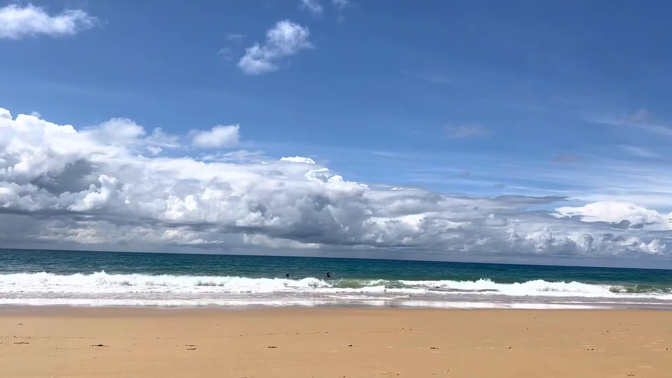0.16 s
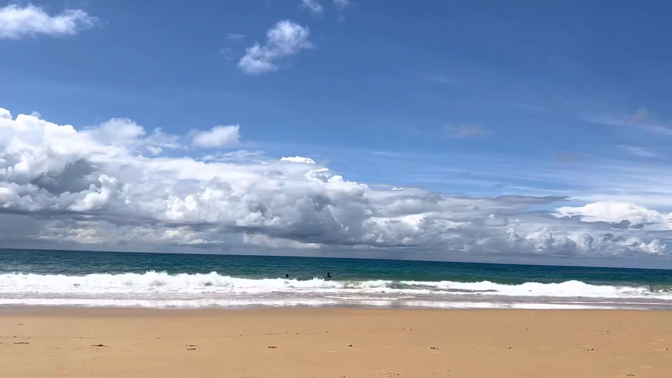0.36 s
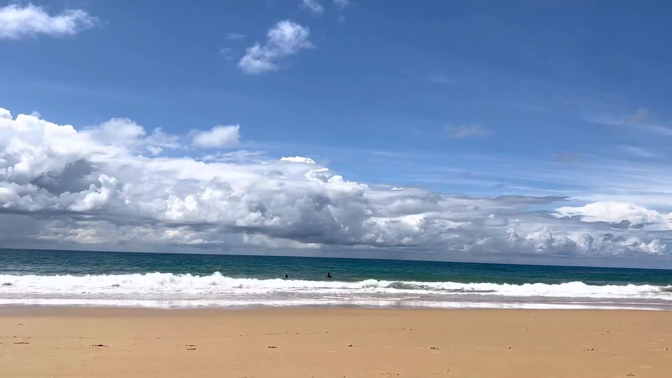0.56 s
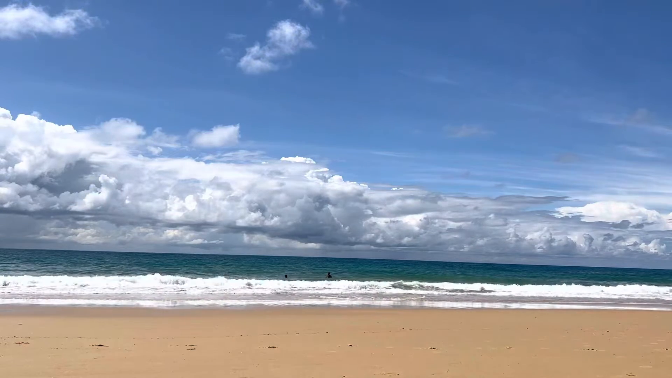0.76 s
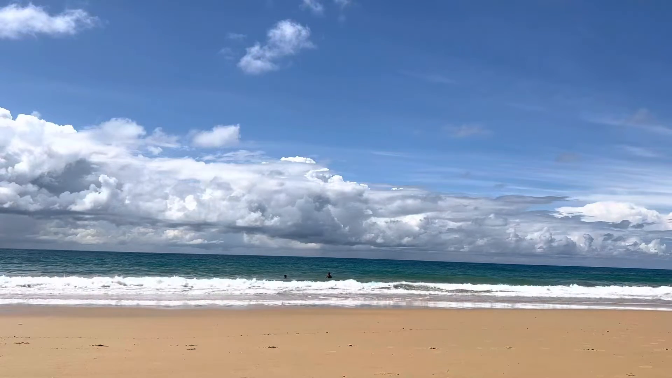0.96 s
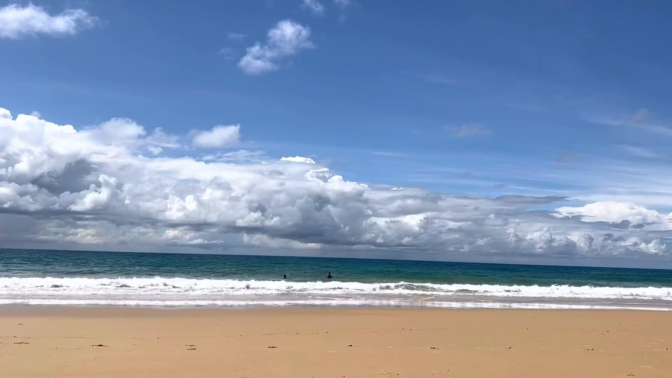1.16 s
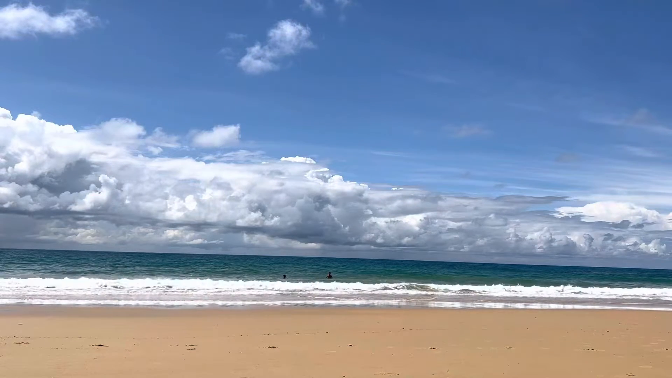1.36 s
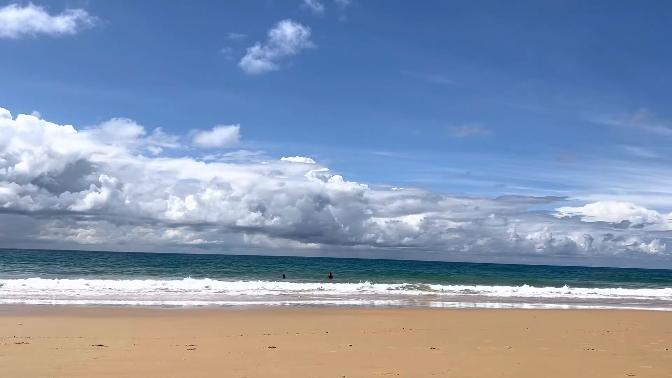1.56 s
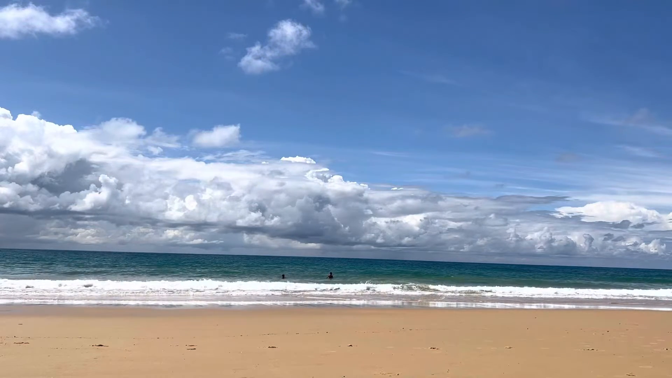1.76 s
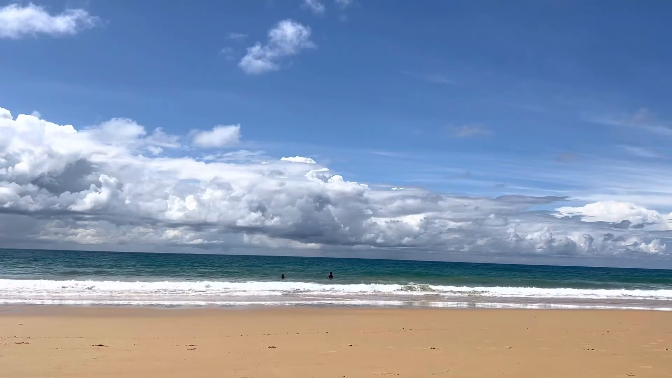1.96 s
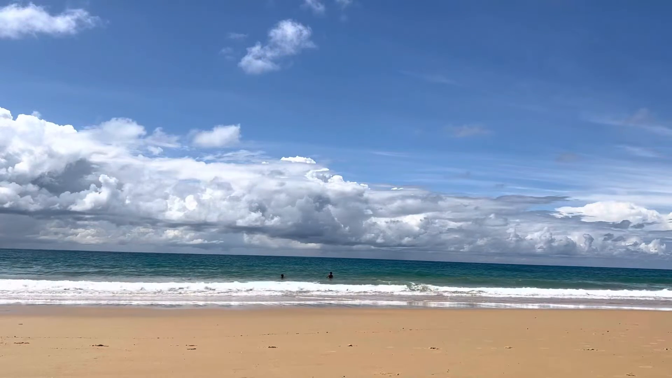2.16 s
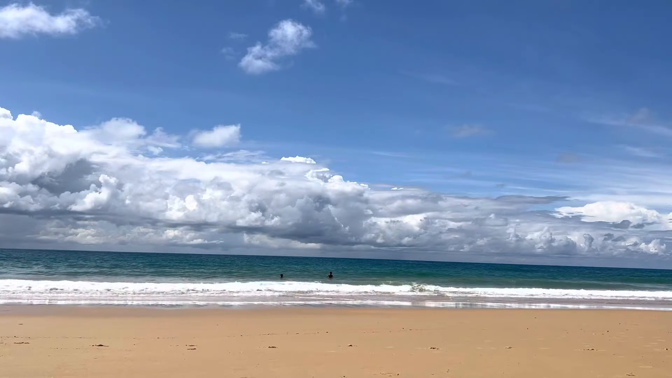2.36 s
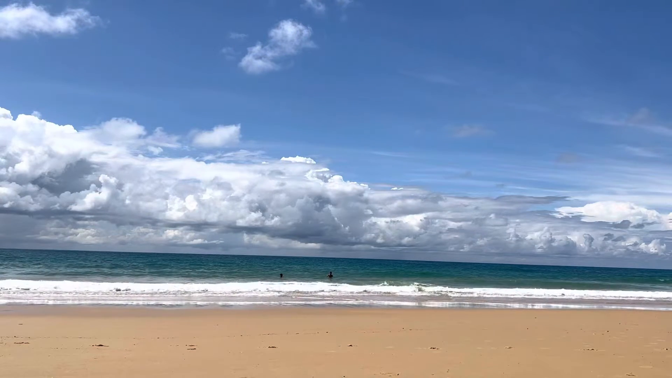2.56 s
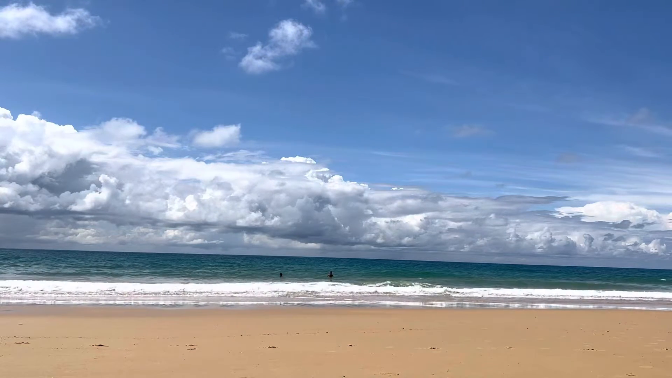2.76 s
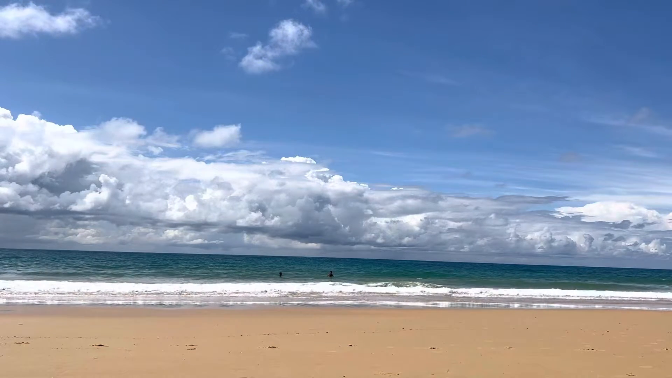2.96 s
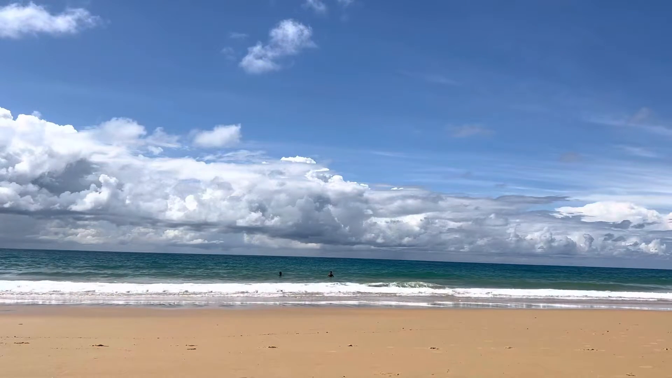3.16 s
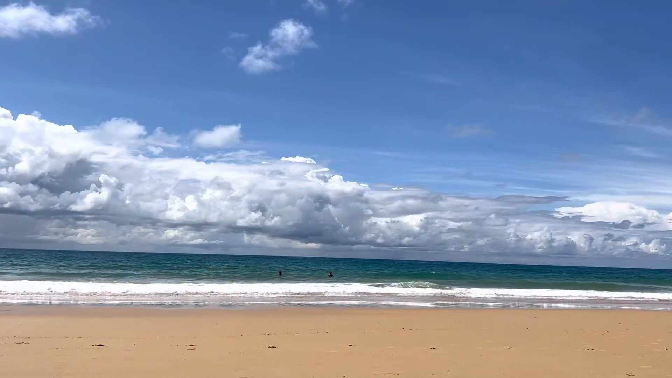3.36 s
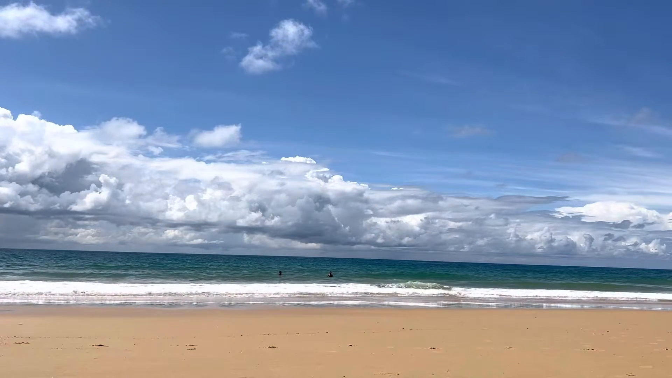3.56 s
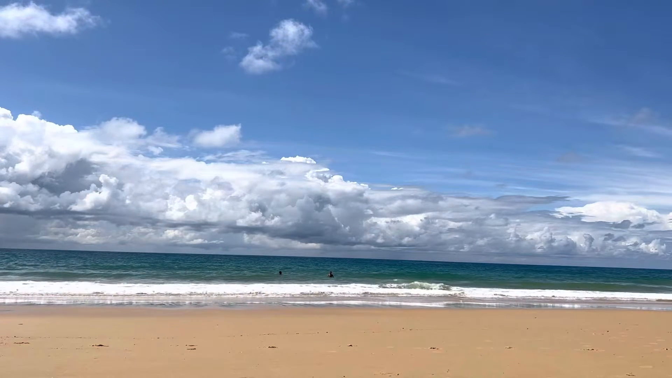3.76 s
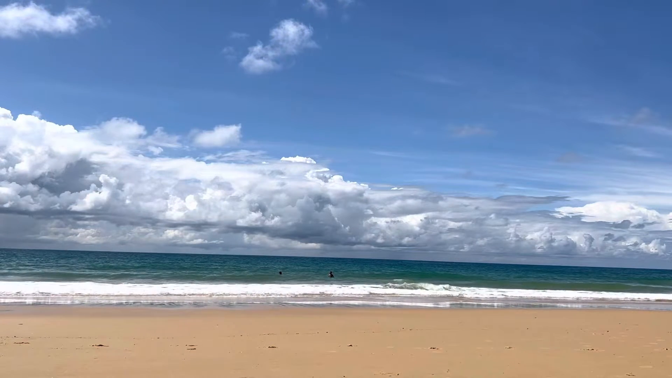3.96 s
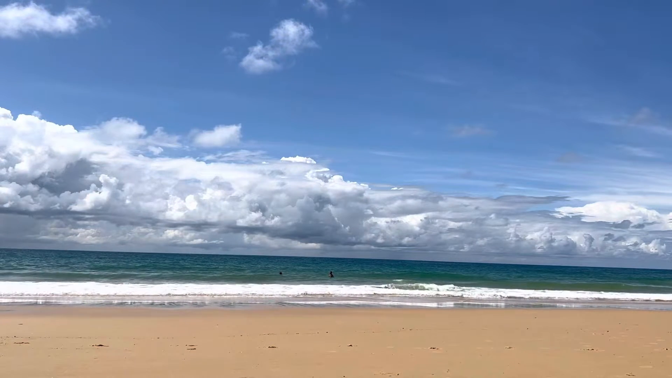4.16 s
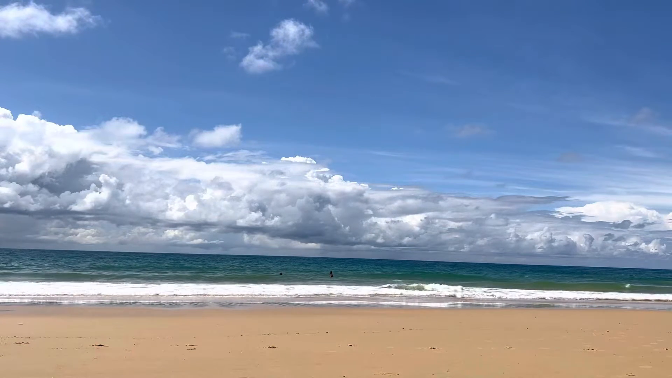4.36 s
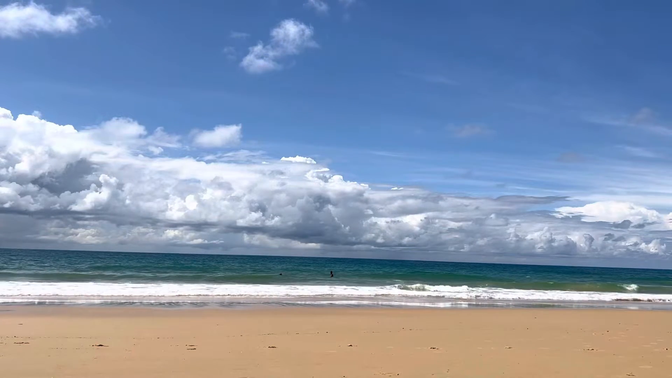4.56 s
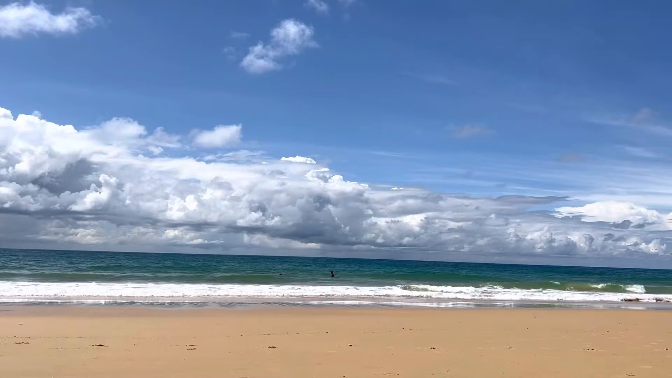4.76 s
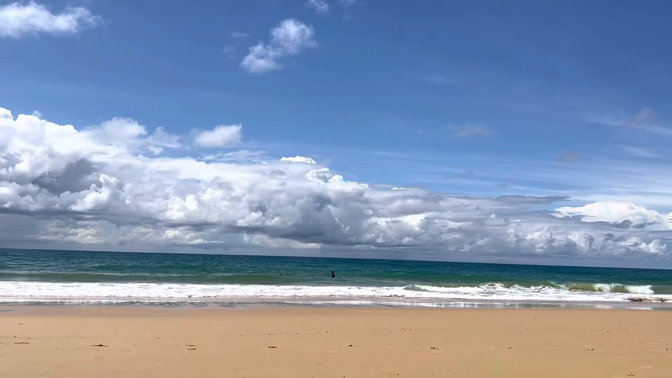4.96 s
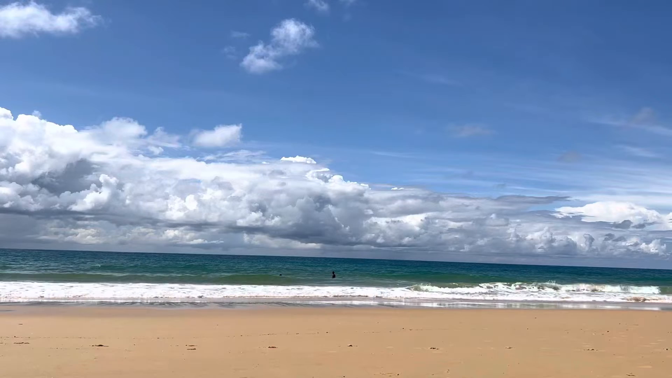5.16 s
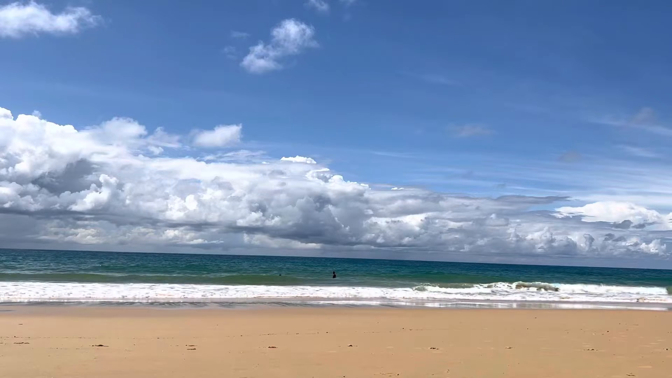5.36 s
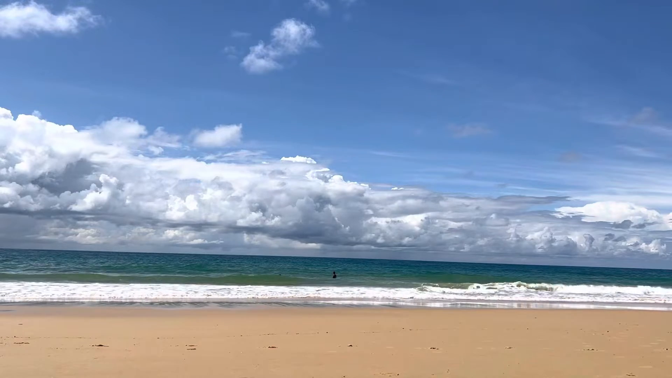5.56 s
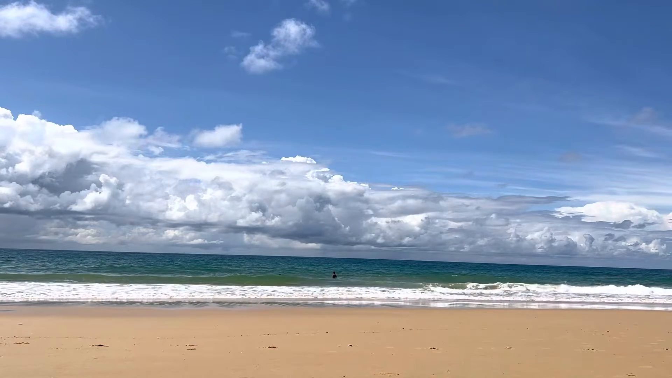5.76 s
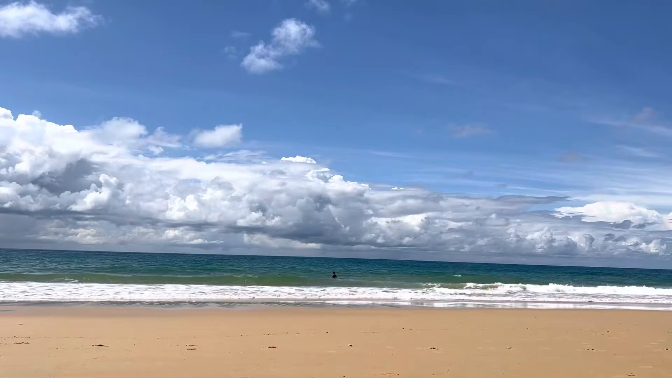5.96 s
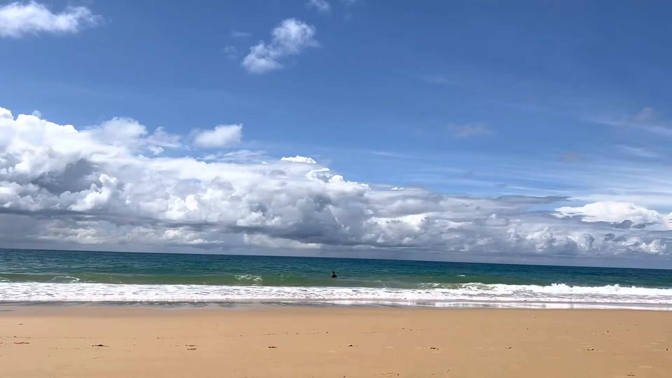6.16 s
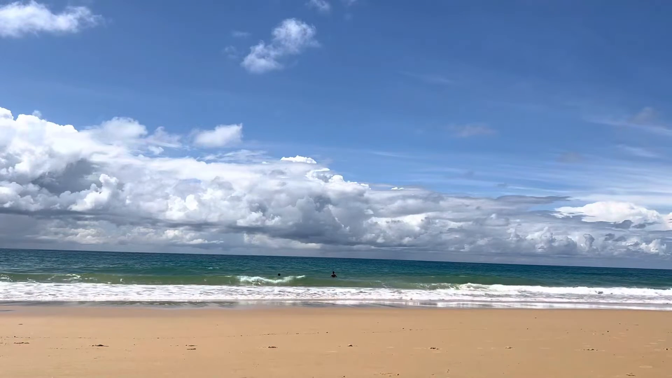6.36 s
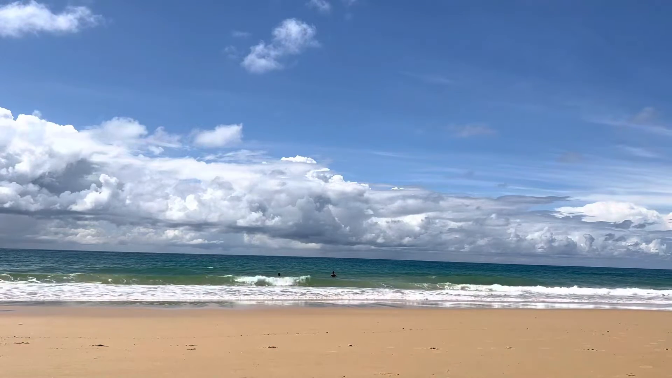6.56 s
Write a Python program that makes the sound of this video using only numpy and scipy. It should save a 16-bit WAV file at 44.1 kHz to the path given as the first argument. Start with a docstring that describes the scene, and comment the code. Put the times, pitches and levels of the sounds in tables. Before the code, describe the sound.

A heavy wave roars on a sandy beach and dies away with low gulping thuds, then lighter waves spill in over hissing wash.

```python
"""Surf on a wide sandy beach, heard in stereo from the dry sand through a phone's two microphones.
It opens on a heavy wave at full roar, a touch to the left, which dies away while trapped air thuds and gulps.
After four seconds a lighter wave spills from the right, and near the end a third starts to break on the left.
Rumble, roar and foam fizz are shaped clouds of random pops that follow the waves; the thuds are short wobbly tones.
A thin sheet of water washes the sand all along, over a steady deep murmur of distant surf."""
import sys
import numpy as np
from scipy import signal
from scipy.fft import rfft, irfft, next_fast_len
from scipy.io import wavfile

SR = 44100
rng = np.random.default_rng(int(sys.argv[2]) if len(sys.argv) > 2 else 0)


def unload_audio(sound):
    """Save the sound as a 16-bit wav file, at the path given as the first command line argument."""
    columns = np.transpose(np.atleast_2d(sound))
    # keep every value between -1 and 1, then stretch to whole-number steps
    steps = np.round(np.clip(columns, -1, 1) * 32767)
    wavfile.write(sys.argv[1], SR, steps.astype(np.int16))


N = 291501
TIME = np.arange(N) / SR  # seconds
SIZE = next_fast_len(N, True)
FREQS = np.maximum(np.arange(SIZE // 2 + 1) * SR / SIZE, 1)  # Hz

# The waves. Each row: start of the spill in seconds, time to break fully in seconds, time at full strength
# in seconds, weight of water in dB, spray in dB, left minus right in dB.
WAVES = [(-1.12, 0.52, 0.72, 0.5, 0.2, 0.2), (4, 1.7, 0.42, -9.6, -3.7, -1.3),
         (6.5, 0.36, 0.3, -7.4, -2.2, 1.2)]
# Stretches of the front that fall in and swell the roar. Each row: peak in seconds, length in seconds,
# bubble pitch in Hz, lift in dB.
COLLAPSES = [(0.196, .5, 1150, 2.4), (.38, 0.67, 2200, 2), (.41, 0.054, 700, 1.5), (.58, .7, 290, 1.8),
             (0.893, .12, 700, 2.2), (1.072, .26, 220, 0), (1.68, 0.44, 420, 1), (1.988, .05, 800, 2.5),
             (2.2, .5, 170, 2.5), (2.6, .7, 270, 1.8), (3.3, 0.69, 340, 1.8), (4.683, .4, 300, 2.6),
             (5.21, 0.054, 750, 4.5), (5.34, .16, 290, 1.5), (5.475, 0.063, 600, 3), (5.68, 0.58, 290, 3.4),
             (5.8, 0.61, 900, 2.4), (6.15, .3, 290, 3), (6.44, 0.61, 320, 2.6), (6.55, 0.53, 1200, 4.5)]
# Pockets of trapped air. Each row: peak in seconds, length in seconds, pitch in Hz, level in dB.
THUDS = [(0.076, 0.075, 124, -28), (0.14, .05, 608, -29.5), (.15, .2, 59.3, -32), (.339, 0.048, 324, -29),
         (.559, .14, 77.8, -32), (0.7, 0.068, 140.3, -28), (.708, .06, 225.6, -30), (0.897, .06, 366, -32),
         (1.056, 0.086, 172, -30), (1.112, .07, 291, -29.5), (1.2, 0.22, 72, -36.5), (1.203, .05, 587, -33),
         (1.676, 0.055, 230, -37), (2.128, 0.075, 145, -33), (2.177, 0.081, 173, -33.5),
         (2.64, .45, 68, -43), (3.092, 0.087, 118, -37), (3.325, .06, 393, -38), (3.357, .08, 129, -36.5),
         (4.325, .1, 58, -38), (4.49, .1, 68, -39), (5.28, .07, 135, -39), (5.355, 0.076, 291, -34.5),
         (5.56, .06, 318, -34), (5.57, 0.23, 72, -41.5), (5.6, .06, 301, -34.5), (5.702, .08, 226, -34.5),
         (5.852, .08, 124.4, -34.5), (6.059, .08, 182.4, -36), (6.137, .08, 151, -34),
         (6.298, 0.065, 145, -36.5), (6.423, .08, 237, -32), (6.453, 0.084, 97, -34.5), (6.54, .2, 66, -40),
         (6.535, 0.067, 361.6, -33.5)]
# Level of the thin sheet of water on the sand. Each row: time in seconds, level in dB.
SHEET_LEVEL = [(0, -47), (1.4, -49.6), (2.8, -48.5), (3.85, -49.3), (4.9, -48.5), (5.4, -48.2),
               (6.05, -50.4), (6.61, -49.6)]

# Colour of the roar from the tumbling front. Each row: frequency in Hz, level in dB.
ROAR_COLOUR = [(110, -25.5), (180, -4.5), (260, -1.87), (400, -0.6), (560, -2), (800, -3.5), (1000, -8),
               (1300, -12.5), (1550, -20.5), (2000, -24), (3000, -37), (5000, -50.5)]
# Colour of the rumble from big air clouds. Each row: frequency in Hz, level in dB.
RUMBLE_COLOUR = [(20, -36), (40, -19), (60, -3.5), (90, -1.3), (150, .5), (190, -1), (260, -6),
                 (450, -26.5)]
# Colour of the wash over the sand. Each row: frequency in Hz, level in dB.
WASH_COLOUR = [(700, -18), (1300, 2), (2000, -1.8), (2900, -3.5), (4000, -8), (5300, -11), (7000, -17.5),
               (10000, -79)]
# Colour of the bursting foam. Each row: frequency in Hz, level in dB.
FIZZ_COLOUR = [(2500, -20), (5000, -3.5), (7000, 0), (8500, -.3), (9400, -4), (10700, -5.5), (12200, 0),
               (13200, -1.5), (14200, -4.5), (15600, -12)]
# Colour of the distant surf. Each row: frequency in Hz, level in dB.
FAR_SURF_COLOUR = [(25, -21), (40, -5), (60, -4.5), (80, -2.5), (130, -14.5)]

# How alike the two microphones hear the surf. Each row: frequency in Hz, likeness from 0 to 1,
# phase by which the left leads in radians.
MICROPHONE_PAIR = [(29.57, 0.82, 0), (130, 0.97, 0.1), (230, 0.91, 0.21), (350, 0.81, 0.16),
                   (566, 0.45, 0.82), (756, 0.01, 1.47), (1310, 0.6, -0.5), (1600, 0.1, -1.2),
                   (2500, 0.56, 0.4), (3230, 0.16, 1.25), (4500, 0.43, 1.07), (6000, 0, 0),
                   (7440, 0.6, -0.5), (8540, 0, 0.2), (8910, 1, -2.5), (10920, 1, -3.5), (12200, 1, -5.5),
                   (14000, 1, -6)]
# The two inlets ring differently. Each row: frequency in Hz, left minus right in dB.
INLETS = [(60, 2), (220, 2.5), (420, 0.5), (1000, 0), (1550, -1), (2000, -1.5), (2900, 6), (4000, 6.5),
          (5400, 13.5), (7000, 5.5), (9000, -0.5)]

# Each kind of water: level for a wave of 0 dB, level of the unrest between waves, fade after a wave.
ROAR_DB, ROAR_REST_DB, ROAR_FADE_DB_PER_S = -24.8, -36.8, 3.8
RUMBLE_DB, RUMBLE_REST_DB, RUMBLE_FADE_DB_PER_S = -30.4, -39.5, 10.5
FIZZ_DB, FIZZ_REST_DB, FIZZ_FADE_DB_PER_S = -57, -63, 8

RUMBLE_LAG_S = 0.52  # air clouds form this long after the crest falls
FIZZ_LINGER_S = 0.42  # foam holds on this much longer before it fades
SPRAY_LEAD = 0.77  # spray peaks after this share of the time that a wave takes to break
TUMBLE_DB, TUMBLES_PER_S = 0.27, 14  # the whole front lurches as it rolls
COLLAPSE_OCTAVES = 0.56  # spread of bubble pitches in a collapse
# Heavy water sounds darker than a thin spill; the commonest bubble pitch is higher in a strong wave.
THIN_TILT_DB, HEAVY_TILT_DB = 1.47, -0.78  # per octave
STRONG_WAVE_BUBBLE_HZ, WEAK_WAVE_BUBBLE_HZ = 452, 285
# The wash hisses higher under fresh foam than under old foam.
FRESH_TILT_DB, OLD_TILT_DB = 0.9, -2  # per octave
WASH_FLICKER_DB, FIZZ_FLICKER_DB = .4, .55
THROB_WOBBLE, THROB_WOBBLES_PER_S = 0.0704, 70  # share of a pocket's pitch, and how often it turns
TOP_HZ = 15000


def roar():
    """Bubbles in the tumbling front roar, darker in heavy water and swelling where the front falls in."""
    fronts = surges(ROAR_FADE_DB_PER_S)
    power = fronts.sum(axis=0)
    tilt_db = THIN_TILT_DB + (HEAVY_TILT_DB - THIN_TILT_DB) * np.sqrt(power)
    common_hz = WEAK_WAVE_BUBBLE_HZ * (STRONG_WAVE_BUBBLE_HZ / WEAK_WAVE_BUBBLE_HZ) ** power

    def emphasis(hz):
        """Lift in dB from the tilt, a broad hump at the commonest bubble pitch, and the collapses."""
        tilt = tilt_db * np.log2(hz / 450)
        hump = 2.0 * np.exp(-(np.log2(hz / common_hz) / 0.89) ** 2)
        return tilt + hump + collapses(hz)

    bubbling = bubbles(ROAR_COLOUR, per_s=5000, scatter_db=3.0, flicker_db=1.0, flicker_rate=36,
                       emphasis=emphasis)
    tumbling = undb(TUMBLE_DB * walk(TUMBLES_PER_S))
    return bubbling * tumbling * strength(fronts, ROAR_DB, ROAR_REST_DB)


def collapses(hz):
    """Lift in dB of the bubbles near hz as stretches of the front fall in."""
    lift_db = 0
    for s, length, pitch_hz, db in COLLAPSES:
        nearness = np.exp(-(np.log2(hz / pitch_hz) / COLLAPSE_OCTAVES) ** 2)
        lift_db = lift_db + db * swell(s, length) * nearness
    return lift_db


def rumble():
    """Whole clouds of air pulse slowly and rumble a little after each crest falls."""
    clouds = surges(RUMBLE_FADE_DB_PER_S, lag_s=RUMBLE_LAG_S)
    pulsing = bubbles(RUMBLE_COLOUR, per_s=4000, scatter_db=1.5, flicker_db=1.0, flicker_rate=9)
    return pulsing * strength(clouds, RUMBLE_DB, RUMBLE_REST_DB)


def thuds():
    """Pockets of trapped air swell and throb for a few uneven cycles: large ones thud, smaller ones gulp."""
    out = np.zeros(N)
    for s, length, hz, db in THUDS:
        wobble = 1 + THROB_WOBBLE * walk(THROB_WOBBLES_PER_S)
        turns = np.cumsum(hz * wobble) / SR
        now = abs(TIME - s) < length / 2
        throb = np.sqrt(2) * np.sin(2 * np.pi * turns[now])
        out[now] += undb(db) * swell(s, length)[now] * throb
    return out


def swash():
    """The wash and the fizz on top of it flicker together in patches."""
    foam = surges(FIZZ_FADE_DB_PER_S, linger_s=FIZZ_LINGER_S, spray=True)
    patches_db = .3 * walk(22)
    return (wash(foam) + fizz(foam)) * undb(patches_db)


def wash(foam):
    """A thin sheet of water runs over the sand, and its hiss is brighter while the foam is fresh."""
    level_db, = over_time(SHEET_LEVEL)
    tilt_db = OLD_TILT_DB + (FRESH_TILT_DB - OLD_TILT_DB) * np.sqrt(foam.sum(axis=0))
    hiss = bubbles(WASH_COLOUR, per_s=14000, scatter_db=2.5, flicker_db=WASH_FLICKER_DB, flicker_rate=30,
                   emphasis=lambda hz: tilt_db * np.log2(hz / 2500))
    return hiss * undb(level_db)


def fizz(foam):
    """Tiny foam bubbles burst, most of them after a wave has thrown up its spray."""
    bursts = bubbles(FIZZ_COLOUR, per_s=30000, scatter_db=3.5, flicker_db=FIZZ_FLICKER_DB, flicker_rate=18)
    return bursts * strength(foam, FIZZ_DB, FIZZ_REST_DB)


def far_surf():
    """Distant breakers along the coast merge into a steady deep murmur."""
    murmur = bubbles(FAR_SURF_COLOUR, per_s=4400, scatter_db=2.5, flicker_db=0.8, flicker_rate=3.5)
    return murmur * undb(-48.5)


def surges(fade_db_per_s, lag_s=0, linger_s=0, spray=False):
    """Power of each wave over time as it builds, holds and dies away; spray peaks before the heavy water."""
    rows = []
    for s, rise, hold, water_db, spray_db, _ in WAVES:
        rise, db = (rise * SPRAY_LEAD, spray_db) if spray else (rise, water_db)
        age_s = TIME - s - lag_s
        build = np.sin(np.pi / 2 * np.clip(age_s / rise, 0, 1)) ** 2
        spent_s = np.maximum(age_s - rise - hold - linger_s, 0)
        rows.append((build * undb(db - fade_db_per_s * spent_s)) ** 2)
    return np.array(rows)


def strength(waves, full_db, rest_db):
    """Gain of one kind of water: the waves add their power to the unrest between them."""
    return np.sqrt(waves.sum(axis=0) * undb(full_db) ** 2 + undb(rest_db) ** 2)


def bubbles(colour, per_s, scatter_db, flicker_db, flicker_rate, emphasis=lambda hz: 0):
    """Two unrelated views of a bubble cloud: uneven pops ring in half-octave bands that each surge alone."""
    happens = rng.random((2, N)) < min(per_s / SR, 1)
    sign = rng.choice([-1, 1], (2, N))
    size = undb(scatter_db * rng.standard_normal((2, N)))
    rings = rfft(happens * sign * size, SIZE) * undb(over_pitch(colour)[0])
    low, high = colour[0][0], colour[-1][0]
    out = np.zeros((2, N))
    for hz in 1000 * 2 ** (np.arange(-12, 9) / 2):
        surge_db = flicker_db * walk(flicker_rate)
        if low / np.sqrt(2) < hz < high * np.sqrt(2):
            band = np.maximum(1 - 2 * abs(np.log2(FREQS / hz)), 0)
            ringing = irfft(rings * band, SIZE)[:, :N]
            out += ringing * undb(surge_db + emphasis(hz))
    return unit(out)


def at_ports(pair):
    """The long shore reaches both microphones alike in the bass and by differing paths higher up."""
    likeness, lead = over_pitch(MICROPHONE_PAIR)
    likeness = np.clip(likeness, 0, 1)
    shares = np.sqrt([(1 + likeness) / 2, (1 - likeness) / 2])
    common, apart = rfft(pair, SIZE) * shares
    left = common + apart
    right = (common - apart) * np.exp(-1j * lead)
    return irfft(np.array([left, right]), SIZE)[:, :N]


def swell(s, length):
    """A smooth rise and fall that peaks at s."""
    return np.cos(np.pi * np.clip((TIME - s) / length, -.5, .5)) ** 2


def walk(rate):
    """A random wander along straight lines between about rate points a second; spread near 1."""
    steps = rng.standard_normal(1024)
    return np.interp(TIME * rate + 1, np.arange(len(steps)), steps) * np.sqrt(3 / 2)


def undb(db):
    """Decibels to gain."""
    return 10 ** (np.asarray(db) / 20)


def unit(x):
    """Scale to an rms (average strength) of 1."""
    return x / np.sqrt(np.mean(x ** 2))


def over_time(table):
    """Each column of a curve at every sample."""
    s, *columns = np.transpose(table)
    return [np.interp(TIME, s, c) for c in columns]


def over_pitch(table):
    """Each column of a spectrum at every frequency."""
    hz, *columns = np.transpose(table)
    return [np.interp(np.log(FREQS), np.log(hz), c) for c in columns]


def scene():
    """Each wave roars from its own side, over the rumble, the swash, the far surf and the thuds."""
    fronts = surges(ROAR_FADE_DB_PER_S)
    sides_db = np.array(WAVES)[:, -1]
    rest_power = undb(ROAR_REST_DB - ROAR_DB) ** 2
    pan_db = sides_db @ fronts / (fronts.sum(axis=0) + rest_power)
    panned_roar = at_ports(roar()) * undb(np.array([pan_db, -pan_db]) / 2)
    surroundings = at_ports(rumble() + swash() + far_surf())
    return panned_roar + surroundings + thuds()


def record(dry):
    """Each inlet colours its channel; the phone cuts the top."""
    inlet_db, = over_pitch(INLETS)
    inlet_gains = undb(np.array([inlet_db, -inlet_db]) / 2)
    coloured = irfft(rfft(dry, SIZE) * inlet_gains, SIZE)[:, :N]
    top_cut = signal.ellip(8, .2, 70, TOP_HZ, fs=SR, output="sos")
    return signal.sosfilt(top_cut, coloured)


dry = scene()
out = record(dry)
unload_audio(out)
```